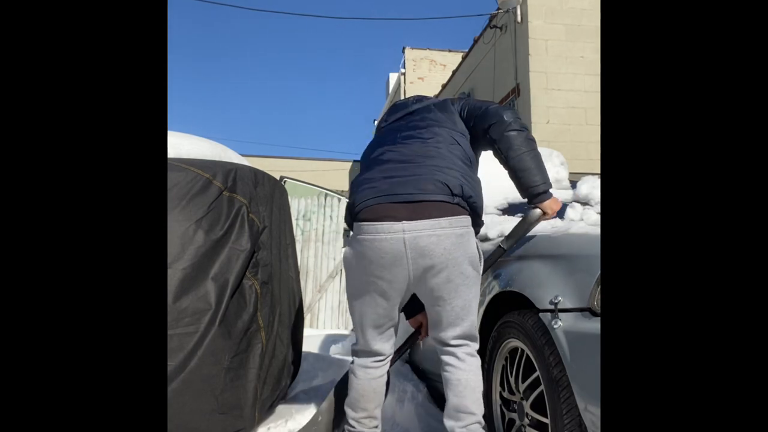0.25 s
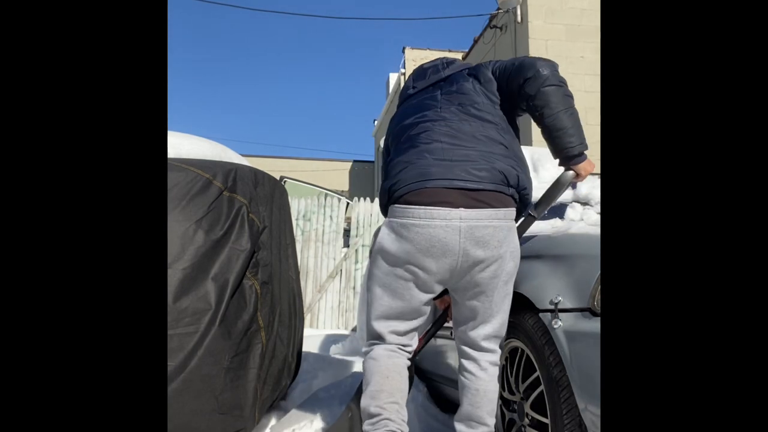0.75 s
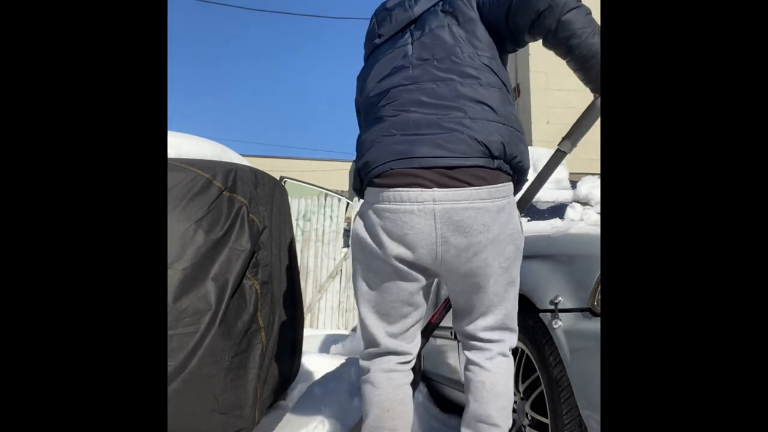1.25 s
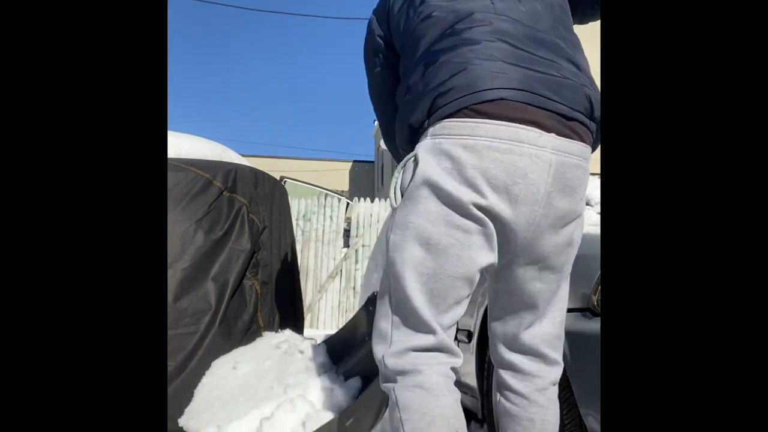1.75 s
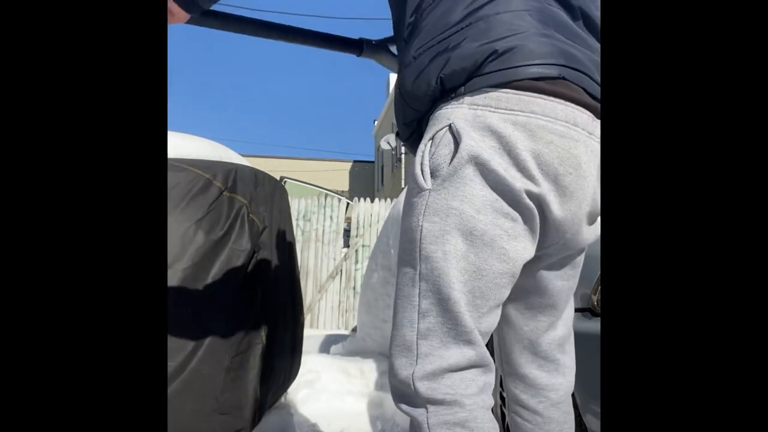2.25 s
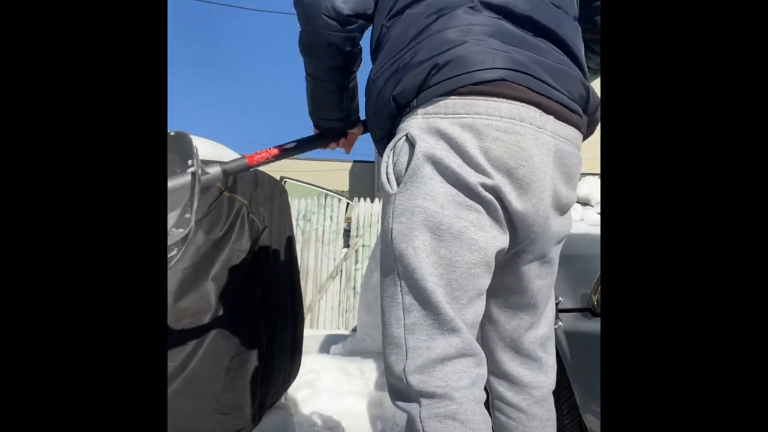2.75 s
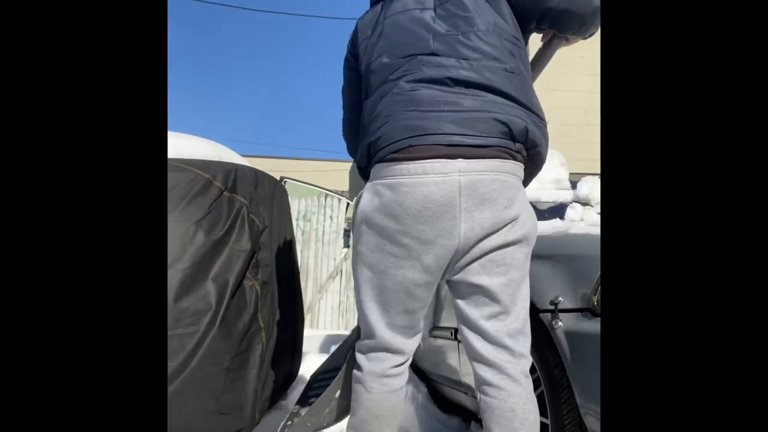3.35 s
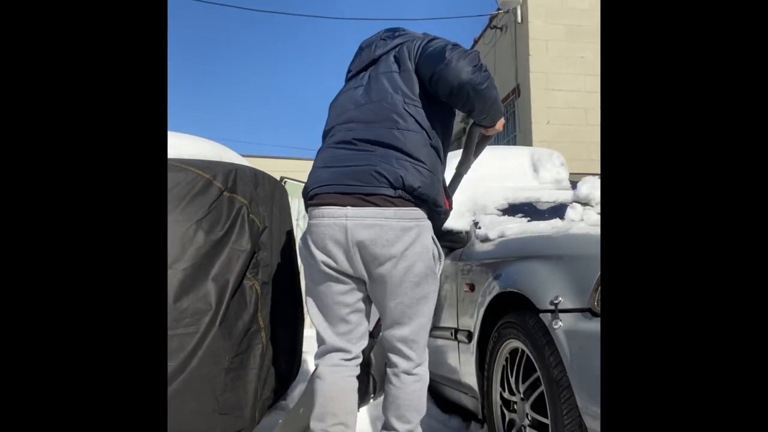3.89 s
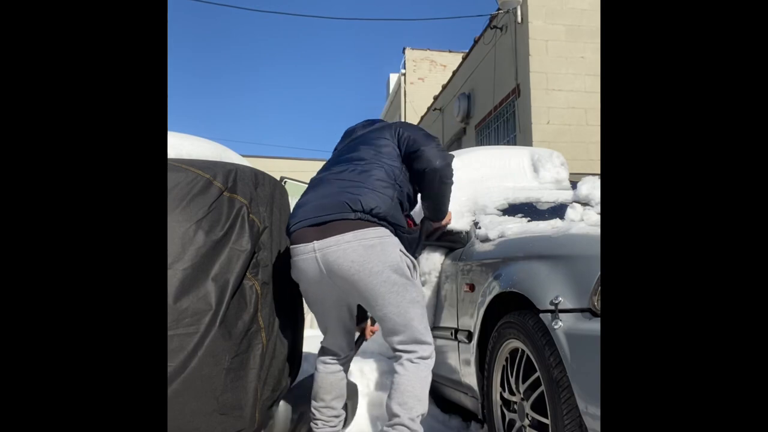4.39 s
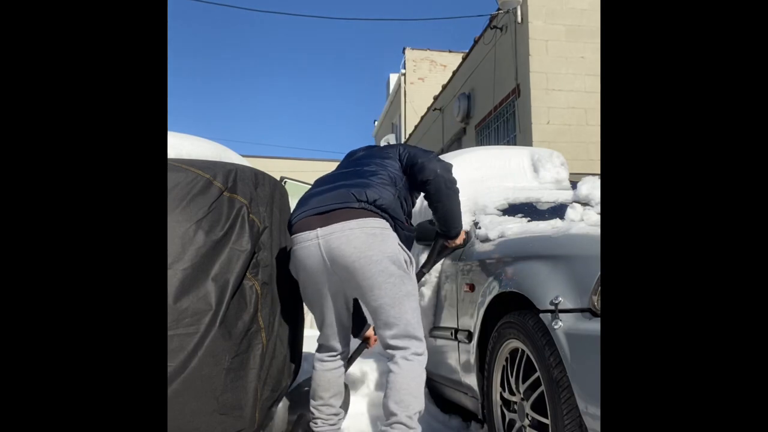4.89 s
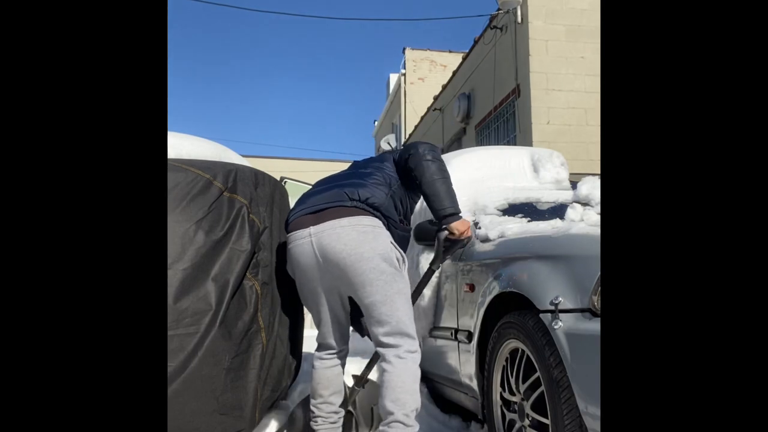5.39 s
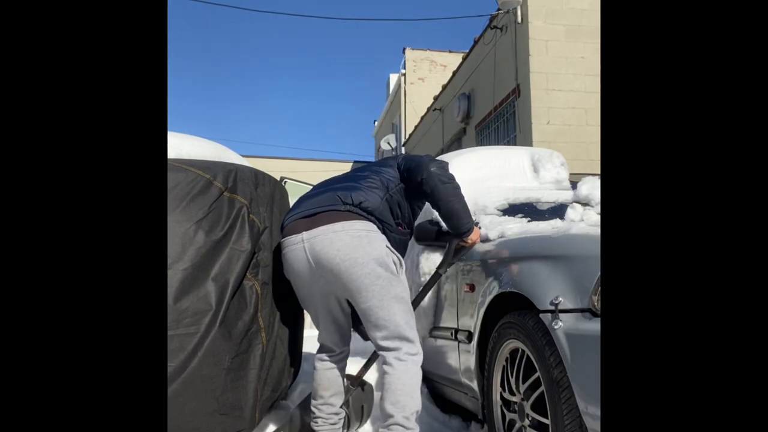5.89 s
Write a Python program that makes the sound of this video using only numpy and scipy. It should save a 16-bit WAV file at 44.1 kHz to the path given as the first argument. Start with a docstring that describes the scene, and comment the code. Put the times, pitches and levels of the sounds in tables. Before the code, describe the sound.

Outdoor snow shoveling, a couple of metres from a stereo phone, over a faint far-off town rumble. At 0.15-0.35 s the blade crunches in with clustered dull thuds, a bright crust snap and brief grating. A sleeve swish and snap come at 0.6, a thud at 0.85, then scattered crunches, ticks and soft thumps from 1.1 to 1.55. A scooping push with several rounded thuds runs 1.65-1.9, ending in a hissy slide and sharp icy snap near 2.1. From 2.45 to 3.05 it is sparse: low wind puffs and faint nylon rustle. A thump lands at 3.3, followed by sleeve rubs and small ticks until 3.85. At 4.16-4.3 one hard chop, by far the loudest event, shatters crust with a short squeak and deep boom. Thuds follow at 4.4-4.5, then repeated soft hissing, crunching pushes from 4.6, with thuds around 5.15, 5.7 and a stronger one at 5.98.

```python
"""Outdoors beside a parked car, someone shovels snow a couple of metres from a phone that hears in stereo.
Coloured random grains make the blade's crunch, soft boom and grating, snapping crust and the hiss of
loose snow and a nylon jacket; damped rings of falling pitch make lumps and blows thud.
One hard chop drives the blade into the bank with a squeak and a deep boom.
Coloured noise makes a town rumble far off and a few gusts brush the microphone."""
import sys
import numpy as np
from scipy import signal
from scipy.fft import rfft, irfft
from scipy.io import wavfile
from scipy.ndimage import uniform_filter1d

SR = 44100
rng = np.random.default_rng(int(sys.argv[2]) if len(sys.argv) > 2 else 0)


def unload_audio(sound):
    """Save the sound as a 16-bit wav file, at the path given as the first command line argument."""
    columns = np.transpose(np.atleast_2d(sound))
    # keep every value between -1 and 1, then stretch to whole-number steps
    steps = np.round(np.clip(columns, -1, 1) * 32767)
    wavfile.write(sys.argv[1], SR, steps.astype(np.int16))


N = 270509
TIME = np.arange(N) / SR
FREQS = np.maximum(np.arange(N // 2 + 1) * SR / N, 1)

# Event levels are relative: the function that plays a table may add a trim of its own.
# gusts on the microphone: start_s, swell_s, ease_s, level_db
GUSTS = [(2.45, 0.017, 0.086, -35.5), (2.565, 0.057, 0.069, -36), (2.72, .03, 0.13, -51),
         (2.94, 0.056, .11, -41.5)]
# pushes of the blade through snow: start_s, swell_s, ease_s, sliding_hiss_db, edge_crunch_db, scoop_boom_db
STROKES = [(0.0, 0.013, 0.031, -61.5, -60, -53.5), (0.09, 0.066, .04, -71, -64, -64),
           (0.221, 0.01, 0.017, -60, -42.5, -34), (0.256, 0.074, 0.0057, -47.5, -55, -48.5),
           (0.37, 0.094, .15, -73, -74, -69), (0.78, 0.19, 0.067, -68.5, -65, -56.5),
           (1.112, 0.077, 0.035, -54.5, -48, -47.5), (1.295, 0.07, 0.069, -58, -63.5, -56.5),
           (1.503, 0.028, 0.12, -53, -55.5, -50.5), (1.65, 0.022, 0.093, -63.5, -66, -56.5),
           (1.737, 0.13, 0.034, -55, -51.5, -48), (1.905, 0.042, 0.043, -59.5, -59.5, -55),
           (2.003, 0.037, 0.2, -57, -51.5, -51), (2.06, 0.046, 0.065, -44.5, -61, -46.5),
           (2.24, 0.011, 0.24, -68, -66, -74), (4.34, 0.057, 0.11, -62.5, -70, -53.5),
           (4.63, 0.13, 0.044, -57, -57, -53.5), (4.85, 0.084, 0.043, -54.5, -65, -58),
           (5.012, 0.13, 0.0092, -48.5, -54, -44.5), (5.14, 0.077, 0.12, -50, -50.5, -48),
           (5.345, 0.089, .045, -48.5, -74, -49), (5.5, 0.06, 0.035, -49, -66, -51),
           (5.57, 0.046, 0.14, -56, -56, -47.5), (5.762, 0.063, 0.11, -48.5, -59, -51.5),
           (6.035, 0.051, 0.086, -59, -71, -51.5)]
# packed snow giving way and lumps landing: start_s, level_db, middle_pitch_hz, crack_relative_db
THUDS = [(0.156, -27.5, 397, -13), (0.226, -34, 470, 1), (0.262, -33.5, 370, -20), (0.322, -39, 367, -7),
         (0.625, -43.5, 334, -22), (0.843, -29, 360, -18), (0.897, -38.5, 330, -17), (1.153, -36, 373, -7),
         (1.29, -38, 350, -15), (1.332, -35.5, 380, -13), (1.351, -32.5, 324, -12), (1.741, -40, 323, -10),
         (1.809, -35, 394, -27), (1.841, -30, 382, -31), (1.867, -31.5, 315, -31), (3.295, -30, 369, -6.5),
         (3.437, -42.5, 332, -7), (3.743, -41.5, 340, -21), (4.397, -35.5, 396, -13),
         (4.505, -29, 330, -17.5), (4.724, -43.5, 409, 2), (5.009, -38, 412, -16), (5.142, -31.5, 437, -19),
         (5.196, -37.5, 434, -25), (5.651, -34.5, 420, -16), (5.797, -35.5, 425, -20),
         (5.982, -24.5, 418, -27), (6.013, -41.5, 320, -5), (6.039, -32.5, 317, -19),
         (6.072, -38, 340, -24)]
# heavy blows through the scoop: start_s, level_db, middle_pitch_hz, swell_s
BLOWS = [(.225, -27.5, 242, 0.0024), (0.336, -35, 163, 0.0093), (.847, -36, 210, 0.0062),
         (1.866, -37, 220, 0.01), (3.299, -31, 150, 0.0064), (4.165, -14.5, 320, 0.0023),
         (4.199, -18.5, 415, 0.0045), (4.222, -16.5, 522, 0.0049), (4.225, -14.5, 229, 0.0039),
         (4.227, -21, 105, 0.007), (4.289, -20, 242, 0.0062), (4.312, -25, 145, 0.01),
         (4.508, -31.5, 154, 0.0053), (5.946, -38.5, 201, 0.011)]
# icy crust snapping: start_s, level_db, decay_s
SNAPS = [(0.156, -49, .003), (0.21, -40, .004), (0.22, -29, 0.015), (0.448, -46, 0.0054),
         (0.619, -32.5, 0.0087), (0.8435, -33.5, .005), (0.897, -41.5, 0.0049), (1.109, -40.5, .007),
         (1.281, -47, 0.015), (1.3037, -33.5, 0.0067), (1.332, -48, .008), (1.35, -38, .007),
         (1.4903, -37.5, 0.0043), (2.1041, -29, 0.0077), (2.935, -43, 0.0063), (3.246, -39, .01),
         (3.288, -54, .007), (3.484, -48.5, 0.0086), (3.764, -40, 0.0045), (3.834, -41.5, 0.0076),
         (4.157, -27, 0.0041), (4.599, -47.5, 0.0068), (4.714, -46, 0.0055), (5.128, -35, .007)]
# the edge grating on frozen ground: start_s, length_s, level_db, blade_ring_hz
GRATES = [(0.211, 0.032, -47, 745), (0.33, 0.005, -47, 1910), (1.156, 0.013, -49, 1120),
          (1.179, 0.034, -47.5, 1110), (1.487, .005, -50, 1290), (1.523, 0.045, -48.5, 1180),
          (2.1, 0.068, -49, 2400), (3.293, 0.0033, -45, 1400), (4.219, 0.0059, -31.5, 2720),
          (4.72, 0.0091, -52, 1800), (5.124, 0.018, -51.5, 2000), (5.636, 0.01, -57, 1800),
          (6.011, 0.0046, -64, 1100), (6.071, 0.0069, -54, 690)]
# nylon sleeves rubbing: start_s, swell_s, ease_s, level_db
SWISHES = [(0.619, 0.0056, 0.035, -44), (0.68, 0.023, 0.03, -61.5), (0.922, 0.072, 0.025, -57.5),
           (1.04, 0.096, .005, -61), (2.44, .015, 0.082, -63.5), (2.56, 0.09, 0.13, -57.5),
           (2.79, 0.11, 0.12, -58.5), (3.03, 0.012, 0.067, -69), (3.25, 0.0074, .105, -53.5),
           (3.39, 0.042, .06, -63.5), (3.517, 0.059, 0.044, -45.5), (3.699, 0.0034, 0.031, -49.5),
           (3.75, 0.011, 0.074, -66), (3.822, .01, .005, -57.5), (4.05, .018, 0.017, -52)]
# the hard chop bites, strikes bottom and slides on: start_s, swell_s, ease_s, hiss_db, crunch_db, boom_db
CHOP = [(4.163, 0.017, 0.049, -32.5, -39.5, -21), (4.221, 0.0056, 0.027, -45, -39.5, -18),
        (4.25, 0.038, 0.019, -41.5, -48.5, -25)]
# cold snow squeaking as the chop compresses it: start_s, level_db
SQUEAKS = [(4.171, -34), (4.182, -22.5), (4.195, -24), (4.208, -25.5)]

# Spectral shapes, each scaled to unit power in use: frequency_hz, relative_density_db_per_hz
# distant town and wind on the microphone
TOWN_SPECTRUM = [(20, -44), (32, -5.5), (45, 3), (75, 3.5), (120, -6.5), (200, -11), (300, -18.5),
                 (450, -25.5), (750, -32), (1000, -31.5), (1400, -42.5), (2000, -39), (3000, -56.5),
                 (11500, -56.5), (14000, -64), (16000, -85)]
GUST_SPECTRUM = [(25, -15), (60, 14.5), (120, 12), (180, -3.5), (260, -7.5), (500, -44), (3000, -64)]
# sliding snow, crunch under the edge and boom of the scoop
HISS_SPECTRUM = [(900, -4), (2000, -5), (3300, -7), (4500, -4.5), (5700, -2), (6600, 2.5), (8000, -6),
                 (9200, -1), (10300, -7.5), (11800, -1), (13500, -9), (15500, -9)]
CRUNCH_SPECTRUM = [(100, -34), (250, -6), (500, 5.5), (750, -2), (1000, 1), (1400, -2), (1900, 1.5),
                   (2500, -7), (3500, -7.5), (7000, -14), (15000, -41)]
SCOOP_SPECTRUM = [(90, -24), (200, 0), (310, -3), (430, 2), (570, -4), (680, -6), (800, -35.5),
                  (1500, -24.5), (5000, -68)]
# cracks of lumps, snapping crust, grating edge and rubbing nylon
CRACK_SPECTRUM = [(300, -7.5), (550, 4), (750, 3), (1000, 0), (1400, -6), (2000, -8.5), (3000, -22),
                  (6000, -19), (15000, -36)]
ICE_SPECTRUM = [(700, -26), (2000, -4.5), (4000, -2.5), (6300, -1), (8000, -4), (10300, -4), (12500, 2.5),
                (15500, -4)]
GRATE_SPECTRUM = [(200, -37), (450, 18), (700, -12.5), (1000, 4.5), (1400, -2), (1900, 1.5), (2500, -4.5),
                  (3300, -8), (5000, -13.5), (15000, -31)]
NYLON_SPECTRUM = [(120, -42), (300, 5.5), (1200, -5.5), (1850, 1.5), (2500, -5.5), (3300, -5.5),
                  (4500, -2.5), (6300, 0.5), (8000, -6), (9200, -1), (10300, -7), (11800, 2.5),
                  (13500, -7.5), (15500, -3)]
# hiss, squeak and boom of the chop
CHOP_HISS_SPECTRUM = [(1500, -20), (2800, 1.5), (3600, -8), (4300, 1), (5100, -5), (6200, 4.5), (7800, -5),
                      (9000, -1), (10300, -7), (12000, -1.5), (13500, -16), (15500, -15.5)]
SQUEAK_SPECTRUM = [(2500, -28), (3700, -19), (4200, 0.5), (5200, 0.5), (6200, 3), (7200, -1.5),
                   (9000, -5.5), (15000, -24)]
CHOP_BOOM_SPECTRUM = [(35, -15.5), (80, 3.5), (130, -6), (210, 3), (380, -2), (480, -14), (580, -3),
                      (680, -33), (850, -47), (1500, -40), (5000, -83)]

# the phone's stereo image by frequency:
# frequency_hz, left_lead_rad, left_minus_right_db, independent_power_share (0 to 1)
STEREO_IMAGE = [(100, 0, 0, .002), (450, -.25, -1.2, .02), (1000, 1, 2, .13), (1350, .1, 6, .12),
                (1750, 0, 0, .03), (2250, 1.5, -2, .15), (2900, 4.5, 9, .22), (3500, 6.28, 1.5, .04),
                (4500, 6.28, .3, .006), (7300, 6.28, 0, .002), (8200, 5.5, 0, .14), (10300, 4.5, 0, .18),
                (12300, 3.4, 0, .05), (12900, 3.14, 0, 0)]

# every movement opens over a share of its swell, climbs to its peak, eases off and dies away
SWELL_DB, EASE_DB, ATTACK_SHARE, RELEASE_S = 6.5, 5, 0.38, 0.017
THUD_SWELL_CYCLES = 1.15  # a lump's ring swells for about one of its cycles
RUMBLE_DB = -42
TOP_HZ = 15800


def undb(db):
    """Logarithmic level: decibels become an amplitude gain."""
    return 10 ** (np.asarray(db) / 20)


def across(table, freqs=FREQS):
    """Interpolation on a logarithmic frequency axis: the columns of a table at every frequency."""
    hz, *columns = np.transpose(table)
    return [np.interp(np.log(freqs), np.log(hz), column) for column in columns]


def colour(x, spectrum, size=4096):
    """Minimum-phase filtering: a spectral shape is imposed causally at unit power gain."""
    freqs = np.maximum(np.arange(size // 2 + 1) * SR / size, 1)
    gain = undb(across(spectrum, freqs)[0])
    cepstrum = irfft(np.log(gain / np.sqrt(np.mean(gain ** 2))))
    # folding the cepstrum onto positive times makes the response causal
    cepstrum[1:size // 2] *= 2
    cepstrum[size // 2:] = 0
    response = irfft(np.exp(rfft(cepstrum)))
    return signal.oaconvolve(x, response)[:N]


def walk(rate):
    """Slow random modulation: levels held for 1 / rate seconds, smoothed twice, with unit deviation."""
    hold = max(int(SR / rate), 1)
    levels = np.repeat(rng.standard_normal(N // hold + 1), hold)
    smooth = uniform_filter1d(uniform_filter1d(levels, hold), hold)[:N]
    return smooth / smooth.std()


def grains(rate, spread_db):
    """Impulsive noise of unit rms: fractures at random moments, a few far larger (smaller if spread < 0)."""
    size = undb(spread_db * np.minimum(rng.exponential(size=N), 4))
    happens = rng.random(N) < rate / SR
    impulses = happens * size * rng.choice([-1, 1], N)
    return impulses / impulses.std()


def push(start, swell, ease):
    """Amplitude envelope of one effort: it opens, swells, eases off and dies away exponentially."""
    t = TIME - start
    opening = np.clip(.5 + t / (ATTACK_SHARE * swell), 0, 1)
    effort_db = np.interp(t, [0, swell, swell + ease], [-SWELL_DB, 0, -EASE_DB])
    release = np.exp(-np.maximum(t - swell - ease, 0) / RELEASE_S)
    return opening * undb(effort_db) * release


def gains(movements):
    """Incoherent summation: overlapping movements add in power, giving one gain per level column."""
    power = sum(np.outer(undb(db) ** 2, push(start, swell, ease) ** 2)
                for start, swell, ease, *db in movements)
    return np.sqrt(power)


def add(track, start, sound):
    """Superposition: a short sound is summed into a track at a time in seconds."""
    i = max(int(start * SR), 0)
    track[i:i + len(sound)] += sound[:N - i]


def thump(hz, swell, sag):
    """Heavily damped resonance: pitch falls through hz as the snow packs, so highs precede lows."""
    t = TIME[:SR // 6]
    pitch = hz * np.exp(sag * (2 * np.exp(-t / (2 * swell)) - 1))
    envelope = t / swell * np.exp(1 - t / swell)
    return envelope * np.sin(2 * np.pi * np.cumsum(pitch) / SR)


def burst(length):
    """Fracture envelope: a rapid exponential opening and a Gaussian decay over length seconds."""
    t = TIME[:SR // 10]
    return (1 - np.exp(-t / .0008)) * np.exp(-(t / length) ** 2)


def shifting(x, depth_db):
    """Independent band modulation: changing grain size makes coarse and fine hiss swell apart."""
    lowpass = signal.butter(4, 6000, fs=SR, output="sos")
    coarse = signal.sosfiltfilt(lowpass, x)
    fine = x - coarse
    return fine * undb(depth_db * walk(22)) + coarse * undb(depth_db * walk(35))


def outdoors():
    """Interchannel coherence: far traffic is alike left and right in the bass, diffuse above; gusts buffet."""
    mid = colour(rng.standard_normal(N), TOWN_SPECTRUM)
    side = colour(rng.standard_normal(N), TOWN_SPECTRUM)
    side = irfft(rfft(side) * np.minimum(FREQS / 700, 1) ** 1.65, N)
    rumble = undb(RUMBLE_DB) * np.array([mid + side, mid - side])
    turbulence = colour(rng.standard_normal(N), GUST_SPECTRUM) * undb(1.9 * walk(30.37))
    return rumble + gains(GUSTS)[0] * turbulence


def strokes():
    """Granular friction: fine grains hiss, coarse ones break in slips, and the slips shake the scoop."""
    slide, edge, boom = gains(STROKES)
    slips = walk(130)
    hiss = shifting(colour(grains(rate=7000, spread_db=1.5), HISS_SPECTRUM), depth_db=2.34)
    hiss = hiss * undb(-0.07 + 0.89 * walk(120))
    crunch = colour(grains(rate=1100, spread_db=0.5), CRUNCH_SPECTRUM) * undb(-0.5 + 0.76 * slips)
    scoop = colour(grains(rate=700, spread_db=4), SCOOP_SPECTRUM) * undb(1.5 + 2.0 * slips)
    return slide * hiss + edge * crunch + boom * scoop


def thuds():
    """Impact resonance: lumps give a crack and a dull ring with a quick overtone; heavy blows ring too."""
    rings, crush = np.zeros(N), np.zeros(N)
    crack_decay = np.exp(-TIME[:SR // 6] / .006)
    for start, db, hz, crack_db in THUDS:
        swell = THUD_SWELL_CYCLES / hz
        add(rings, start, undb(db) * thump(hz, swell, sag=0.3))
        add(rings, start, undb(db - 17) * thump(1.47 * hz, swell / 2, sag=0.48))
        # the crack leads the ring by a millisecond
        add(crush, start - .001, undb(db + crack_db + 1.5) * crack_decay)
    for start, db, hz, swell in BLOWS:
        add(rings, start, undb(db + 2.5) * thump(hz, swell, sag=.2))
    return rings + crush * colour(grains(rate=12000, spread_db=2), CRACK_SPECTRUM)


def snaps():
    """Brittle fracture: crust breaks in a short bright spray of grains."""
    spray = np.zeros(N)
    for start, db, length in SNAPS:
        add(spray, start, undb(db - 6.0) * burst(length))
    return spray * colour(grains(rate=10000, spread_db=6.5), ICE_SPECTRUM)


def grates():
    """Stick-slip excitation: the edge chatters unevenly over ice and rings the blade where it touches."""
    chatter = colour(grains(rate=1300, spread_db=4.0), GRATE_SPECTRUM) * undb(-2.5 + 4.6 * walk(210))
    out = np.zeros(N)
    for start, length, db, hz in GRATES:
        contact = np.interp(TIME - start, [-.002, 0, length, length + 0.0081], [0, 1, 1, 0])
        slips = chatter * undb(db) * contact
        ring = signal.lfilter(*signal.iirpeak(hz, 2.5, fs=SR), slips)
        out += 0.75 * slips + 1.57 * ring
    return out


def jacket():
    """Textile friction: nylon threads flick over each other as the arms swing."""
    rub = gains(SWISHES)[0]
    threads = colour(grains(rate=14000, spread_db=2.5), NYLON_SPECTRUM)
    return rub * threads * undb(3.0 + 2.0 * walk(110))


def chop():
    """Compressive failure: as the blade enters the bank, crust shatters and snow squeaks over a boom."""
    slide, edge, boom = gains(CHOP)
    slips, squeeze = walk(220), np.zeros(N)
    for start, db in SQUEAKS:
        add(squeeze, start, undb(db) * burst(length=0.0046))
    hiss = colour(grains(rate=7800, spread_db=3), CHOP_HISS_SPECTRUM) * undb(0.5 + 1.3 * slips)
    crunch = colour(grains(rate=3000, spread_db=-1.5), CRUNCH_SPECTRUM) * undb(5.5 + 1.0 * slips)
    squeak = colour(grains(rate=7500, spread_db=4.0), SQUEAK_SPECTRUM)
    deep = colour(grains(rate=1500, spread_db=-1.5), CHOP_BOOM_SPECTRUM)
    return slide * hiss + edge * crunch + squeeze * squeak + boom * deep


def grainy():
    """Superposition of everything made of countless small fractures and flicks."""
    return strokes() + snaps() + grates() + jacket() + chop()


def stereo(common, independent):
    """Phone stereo: phase, level and a share of independent grains, set by frequency, part left from right."""
    lead, tilt_db, share = across(STEREO_IMAGE)
    centre = np.sqrt(1 - share) * rfft(common)
    spread = 1j * np.sqrt(share) * rfft(independent)
    left = (centre + spread) * undb(tilt_db / 2)
    right = (centre - spread) * undb(-tilt_db / 2) * np.exp(-1j * lead)
    # keep the mean power of the two channels whatever the tilt
    balance = np.sqrt((undb(tilt_db) + undb(-tilt_db)) / 2)
    return irfft(np.array([left, right]) / balance, N)


def scene():
    """Superposition of the shovel work, widened by independent grains, and the open air."""
    return stereo(common=grainy() + thuds(), independent=grainy()) + outdoors()


def record(dry):
    """Band limitation: the phone cuts the top with a steep elliptic low-pass."""
    lowpass = signal.ellip(8, .2, 70, TOP_HZ, fs=SR, output="sos")
    return signal.sosfilt(lowpass, dry)


dry = scene()
out = record(dry)
unload_audio(out)
```